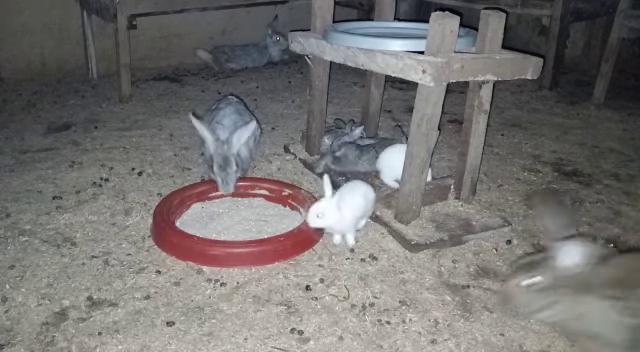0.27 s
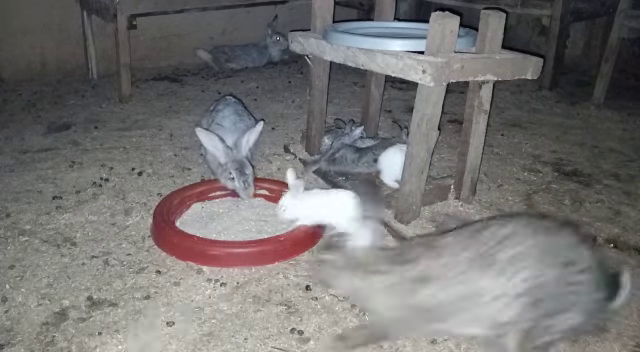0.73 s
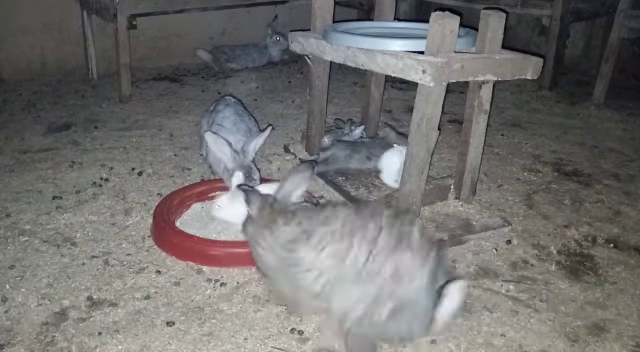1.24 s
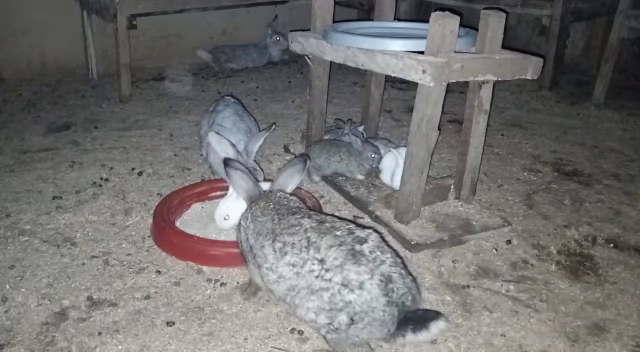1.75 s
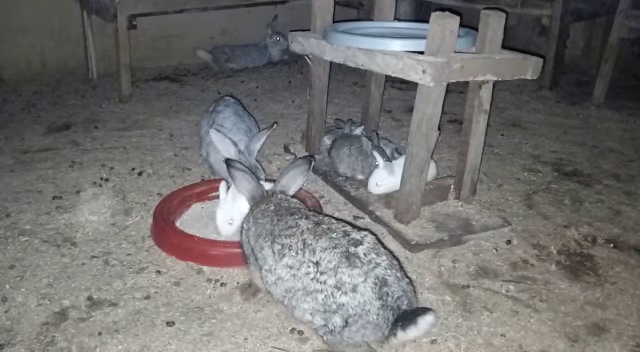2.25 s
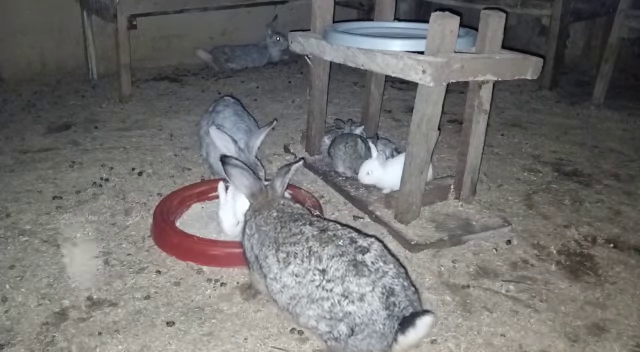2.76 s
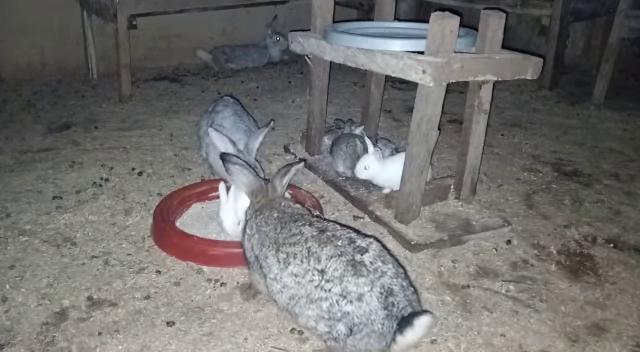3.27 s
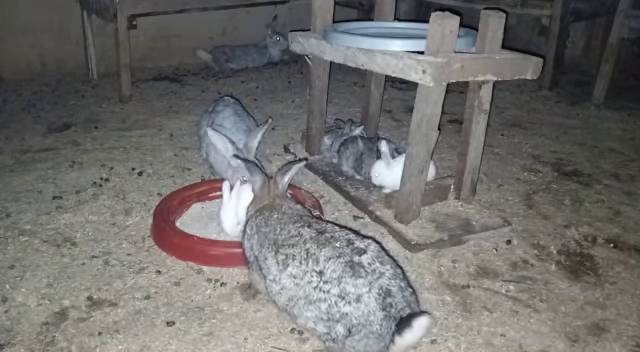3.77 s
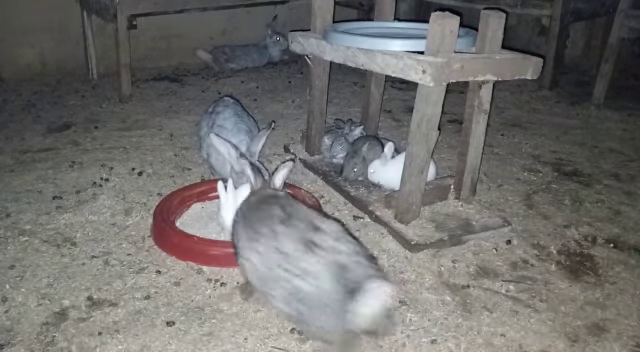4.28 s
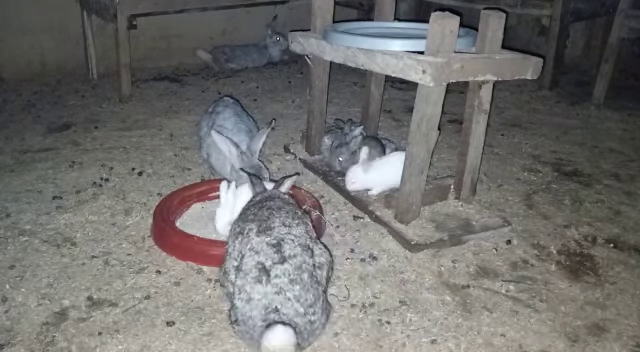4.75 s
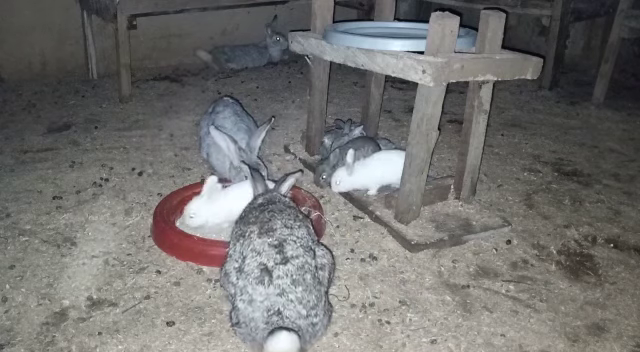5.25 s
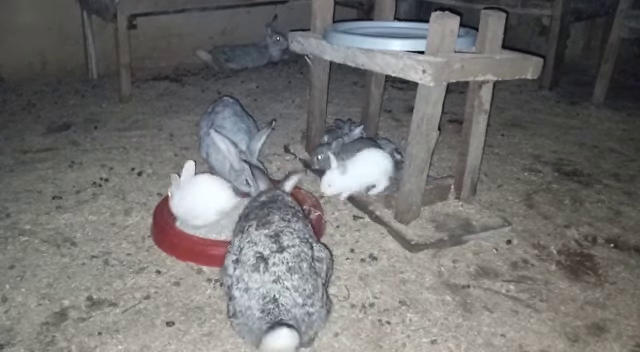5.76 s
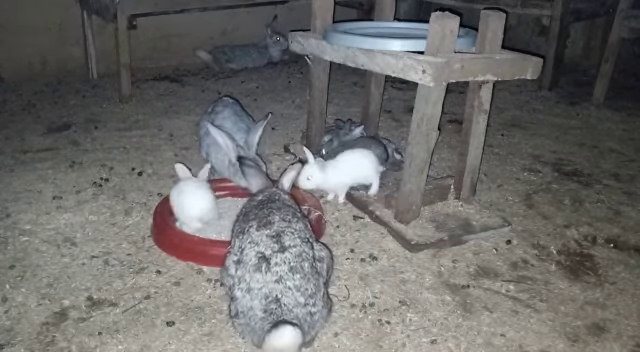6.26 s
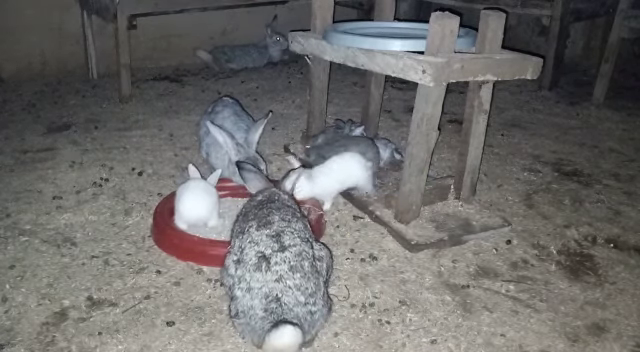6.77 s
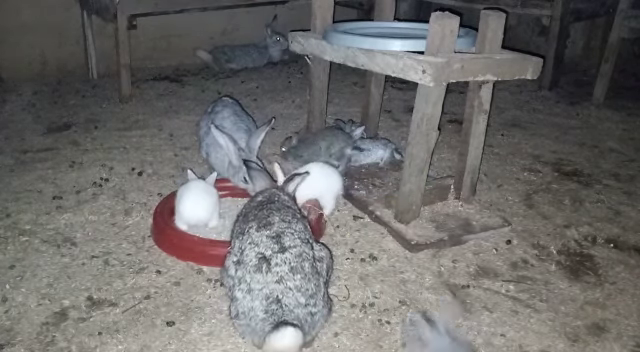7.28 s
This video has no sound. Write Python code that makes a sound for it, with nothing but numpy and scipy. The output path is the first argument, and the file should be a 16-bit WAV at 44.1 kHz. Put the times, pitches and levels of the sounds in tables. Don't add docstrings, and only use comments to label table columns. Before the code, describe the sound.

Piercing, rapid cricket chirping dominates a quiet night pen, with soft rabbit scuffs, tray knocks, dull foot thumps and one tiny low grunt.

```python
import sys
import numpy as np
from scipy import signal
from scipy.fft import rfft, irfft, next_fast_len
from scipy.io import wavfile
from scipy.ndimage import uniform_filter1d

SR = 44100
rng = np.random.default_rng(int(sys.argv[2]) if len(sys.argv) > 2 else 0)


def volts_from_db(level):
    exponent = np.asarray(level, float) / 20
    return 10 ** exponent


def bounce(signal):
    frames = np.transpose(np.atleast_2d(signal))
    limited = np.clip(frames, -1, 1)
    pcm = np.round(limited * 32767).astype(np.int16)
    wavfile.write(sys.argv[1], SR, pcm)


N = 331632


def evened(x):
    return x / np.sqrt(np.mean(x ** 2) + 1e-20)


def read(points, hz):
    f, value = np.transpose(points)
    return np.interp(np.log(hz + 1), np.log(f + 1), value)


def add(mix, s, sound):
    at = int(np.ceil(s * SR))
    part = mix[max(at, 0):][:max(len(sound) + min(at, 0), 0)]
    part += sound[max(-at, 0):][:len(part)]


def coloured(x, points):
    size = next_fast_len(len(x))
    gain = volts_from_db(read(points, np.fft.rfftfreq(size, 1 / SR)))
    return irfft(rfft(x, size) * gain, size)[:len(x)]


def resonate(x, hz, width_hz):
    r = np.exp(-np.pi * width_hz / SR)
    return 2 * signal.lfilter([1 - r], [1, -r * np.exp(2j * np.pi * hz / SR)], x).real


def resonate_twice(x, hz, width_hz):
    return resonate(resonate(x, hz, width_hz), hz, width_hz)


def ramp(left, width):
    return np.sin(np.pi / 2 * np.clip(left / width, 0, 1)) ** 2


def chirps():
    # (start [s], chirps [count], gap [ms])
    even_runs = [(0.0047, 6, 104.9), (0.6372, 2, 114.3), (0.8596, 4, 107.3), (1.2861, 4, 106.5),
                 (1.709, 5, 104.3), (2.2346, 3, 102.7), (2.5465, 2, 110.2), (2.7622, 2, 103.4),
                 (2.9706, 2, 109.4), (3.1898, 4, 106.4), (3.6186, 3, 103.9), (3.9328, 2, 103.8),
                 (4.144, 2, 109.3), (4.3596, 3, 104.7), (4.676, 3, 106.5), (5.0017, 2, 117.0),
                 (5.2306, 2, 140.4), (5.4849, 2, 112.7), (5.703, 3, 106.4), (6.0233, 5, 104.5),
                 (6.5484, 4, 104.7), (6.9782, 6, 105.1)]
    # (time [s], level [dB])
    effort_curve = [(0, -2), (.8, -0.98), (2.5, -0.96), (4.7, -0.6), (5.5, -1.12), (7.5, -1)]
    s = np.concatenate([start + gap_ms / 1000 * np.arange(round(count)) for start, count, gap_ms in even_runs])
    uneven, catch = rng.standard_normal((len(s), 2)).T
    level_db = np.interp(s, *np.transpose(effort_curve)) + 0.17 * uneven
    return np.transpose([s, level_db, 1.5 + 0.9 * catch])


def wing_strokes(before):
    # (start [s], pitch [factor], glide [share], tone [dB], overtone [dB], scrape [dB])
    stroke_table = [
        (-.0560, .825, 0.28, -32.5, -21, -17),
        (-.0472, 0.97, 0.8, -16.5, 3.5, -7),
        (-.03226, 0.99, 0.89, -4.5, 12, -2),
        (-.01441, 1, 1, -0.93, 2.5, -5.5),
    ]
    wing_glide = 7780.6, 6904.8, .672, .01283, .00139, .00535, .008
    top_hz, end_hz, bend, length, rise, fall, high_fall = wing_glide
    tone, overtone, scrape = np.zeros((3, before + N + 32))
    song = chirps()
    chance = rng.standard_normal((len(song), len(stroke_table), 4))
    chance[:, -1, 0] = 0
    for (s, level_db, catch_db), dice in zip(song, chance):
        for stroke, (early, sharp, strong, hard) in zip(stroke_table, dice):
            lead, pitch, share, tone_db, over_db, scrape_db = stroke
            start = before / SR + s + lead + 3e-5 * early
            u = (np.arange(int(length * SR)) + (-start * SR) % 1) / SR
            v = u / length
            glide = top_hz * v + share * (end_hz - top_hz) * v ** (bend + 1) / (bend + 1)
            detune = 1 + 0.0016 * np.clip(sharp, -1.5, 1.5) / share ** 1.8
            phase = 2 * np.pi * length * pitch * detune * glide
            size = volts_from_db(level_db + 0.36 * strong / share ** 1.5) * ramp(u, rise)
            size = size * ramp(2.5 * share * length - u, 0.004)
            add(tone, start, volts_from_db(tone_db) * size * ramp(length - u, fall) * np.cos(phase))
            add(overtone, start, volts_from_db(over_db) * size * ramp(length - u, high_fall) * np.cos(2 * phase))
            friction = np.exp(-u / 0.0013) + 0.14 * ramp(length - u, fall)
            add(scrape, start, volts_from_db(scrape_db + catch_db + 1.8 * hard) * friction)
    return tone, overtone, scrape * rng.standard_normal(len(scrape))


def slips(length, before):
    # (time [s], level [dB])
    slip_times = [(.393, 1), (.623, 0), (1.272, 0), (1.485, -3), (1.695, -2), (2.093, -2), (2.202, -5),
                  (2.514, -6), (2.625, 1), (3.047, -6.5), (3.918, -4), (4.857, -9), (5.072, -2.5),
                  (5.453, 2.5), (5.777, 1), (6.304, -3), (6.945, -2), (7.052, -2), (7.367, 1)]
    # (frequency [Hz], level [dB])
    slip_colour = [(6500, -38.5), (8200, -3.5), (9500, -3.5), (11000, -6.5), (12500, -18.5), (14000, -16.5),
                   (16500, -34.5)]
    out, u = np.zeros(length), np.arange(400) / SR
    noises = rng.standard_normal((len(slip_times), len(u)))
    for (s, level_db), noise in zip(slip_times, noises):
        click = evened(noise * np.exp(-u / 0.0015)) * 0.24
        add(out, before / SR + s, volts_from_db(level_db + 2.5) * click)
    return coloured(out, slip_colour)


def paths(table):
    ms, db = np.transpose(table)
    lag = np.arange(2600)[:, None] - 32 - ms * SR / 1000
    return (volts_from_db(db) * np.sinc(lag) * np.exp(-(lag / 12) ** 2)).sum(axis=1)


def late(start_s, seed_taps, haste):
    # (frequency [Hz], t60 [s])
    pen_decay = [(5000, 0.17), (7300, 0.6), (10000, 0.091), (15000, 0.15)]
    hz, t, z = signal.stft(seed_taps, SR, nperseg=128)
    decay = volts_from_db(-60 * haste * t / read(pen_decay, hz)[:, None])
    tail = signal.istft(z * decay, SR, nperseg=128)[1]
    tail = tail * np.clip(np.arange(len(tail)) / SR / start_s - .5, 0, 1)
    return tail / np.linalg.norm(tail)


def cricket():
    # (delay [ms], level [dB])
    tone_paths = [(-0.007, -38.9), (1.142, -30.2), (2.06, -31.4), (2.97, -28.1), (4.146, -33.6),
                  (5.194, -35.1), (6.626, -45.4), (7.766, -46.7), (9.032, -37.1), (10.861, -33.9),
                  (11.728, -40.0), (12.46, -35.5), (13.861, -36.0), (15.46, -38.4), (16.781, -50.2),
                  (18.341, -40.3), (22.872, -44.3), (24.276, -47.1), (26.733, -50.6), (32.363, -45.7),
                  (33.82, -46.5), (34.861, -43.6), (40.153, -50.2), (42.899, -51.3), (43.951, -44.8),
                  (46.311, -49.0), (48.351, -52.2), (52.178, -52.0)]
    # (delay [ms], level [dB])
    overtone_paths = [(0.462, -75.0), (1.374, -75.2), (2.03, -61.5), (2.479, -60.5), (3.2, -63.0),
                      (3.647, -63.9), (4.502, -71.8), (5.225, -69.9), (5.864, -75.3), (6.802, -71.4),
                      (7.741, -75.8), (11.794, -81.5), (18.81, -76.1), (19.262, -75.2)]
    # (frequency [Hz], level [dB])
    overtone_colour = [(11500, -45), (12800, -11), (13700, -11.5), (14400, -1), (15600, 2.5),
                       (16100, -18.5)]
    # (frequency [Hz], level [dB])
    scrape_colour = [(4800, -41.5), (5600, -30), (6500, 5.5), (8200, -1), (9500, -5.5), (11000, -18),
                     (12800, -31.5), (15000, -16), (16500, -42.5)]
    before = SR // 10
    tone, overtone, scrape = wing_strokes(before)
    low_wing_mode = volts_from_db(-21.5) * resonate_twice(scrape, 5290, 200)
    scrape = coloured(scrape, scrape_colour) + low_wing_mode + slips(len(scrape), before)
    overtone = coloured(overtone, overtone_colour)

    def hear(x, response):
        return signal.oaconvolve(x, response)[before + 32:][:N]

    near = volts_from_db(1.93) * hear(tone, paths(tone_paths)) + volts_from_db(4.0) * hear(overtone, paths(overtone_paths))
    far = hear(volts_from_db(-45.0) * tone + volts_from_db(-71) * overtone, late(0.018, rng.standard_normal(SR // 3), 0.76))
    catch = late(0.0014, rng.standard_normal(SR // 3), 1.5)
    catch[110] += .35
    return near + far + volts_from_db(-38.0) * hear(scrape, catch)


def night():
    # (frequency [Hz], density [dB per Hz])
    night_colour = [(12, -27.5), (20, 0), (43, -0.5), (91, 0), (210, -3), (656, -13), (754, -13),
                    (2050, -19.5), (2360, -19.5), (2710, -20), (3840, -22), (4850, -21), (5200, -19.5),
                    (6760, -42), (11400, -120)]
    frames, hz = N // 256 + 5, np.fft.rfftfreq(1024, 1 / SR)
    a, b, patches = rng.standard_normal((frames, 513, 3)).T
    patches = uniform_filter1d(patches, size=10, axis=0)
    patches = evened(uniform_filter1d(patches, size=12, axis=1))
    z = (a + 1j * b) * volts_from_db(read(night_colour, hz)[:, None] + 1.5 * patches)
    return volts_from_db(-81.5) * evened(signal.istft(z, nperseg=1024, noverlap=768)[1][:N])


def far_insect(level, hz, width_hz):
    return level * evened(resonate_twice(rng.standard_normal(N), hz, width_hz))


def wavering():
    width = int(.03 * SR)
    swell = uniform_filter1d(uniform_filter1d(rng.standard_normal(N), width), width)
    return volts_from_db(-94.5 + 3.5 * evened(swell))


def contacts(events):
    out, t, place = np.zeros(N), np.arange(SR // 3) / SR, np.linspace(0, 1, num=7)
    for s, peak_db, low_hz, high_hz, high_db, length in events:
        noise, size, pick = rng.standard_normal(len(t)), rng.exponential(1, len(t)), rng.random(len(t))
        clicks = (pick < 500 / SR) | (np.arange(len(t)) == 40)
        grit = 0.15 * noise + np.sign(noise) * volts_from_db(3.7 * np.minimum(size, 3)) * clicks
        swell = np.clip(t / min(0.0031, 0.25 * length), 0, 1)
        spread = max(1, 0.93 * np.log(high_hz / low_hz))
        sound = 0
        for where, stray in zip(place, rng.uniform(-1.3, 1, len(place))):
            hz = low_hz * (high_hz / low_hz) ** where * (1 + .04 * stray)
            width_hz = 60 + 0.076 * hz * spread
            t60 = 0.29 * (700 / hz) ** 0.65
            shape = swell * volts_from_db(-60 * np.maximum(t - length, 0) / t60 - 4 * t / length)
            mode = evened(resonate_twice(grit, hz, width_hz))
            sound = sound + volts_from_db(where * high_db) * mode * shape * volts_from_db(1.0 * stray)
        add(out, s, volts_from_db(peak_db - 11.0) * sound)
    return out


def scuffs():
    # (time [s], peak [dB], lowest mode [Hz], length [s])
    scuff_table = [(0.238, -72.5, 952, 0.034), (0.528, -75.5, 1540, .031), (0.703, -76, 898, 0.026),
                   (1.086, -64, 1610, .061), (1.39, -74, 684, .065), (1.629, -77.5, 2030, .03),
                   (2.613, -65, 1740, 0.019), (2.65, -78, 1370, 0.036), (3.114, -77.5, 697, .046),
                   (3.355, -72.5, 410, 0.064), (3.432, -75.5, 390, 0.052), (3.773, -72.5, 974, .034),
                   (3.869, -78.5, 845, 0.051), (5.73, -67, 1414, 0.042), (5.738, -79, 2960, .033),
                   (5.94, -70, 978, 0.025), (6.047, -72.5, 890, 0.044), (6.141, -78, 684, .035),
                   (6.642, -72.5, 853, 0.035), (6.81, -85, 1280, .13), (7.39, -56, 1454, 0.0627)]
    return contacts([(s, db, hz, hz * 1.385, -4.5, length) for s, db, hz, length in scuff_table])


def grunt():
    # (time [s], level [dB], pitch [Hz], second harmonic [dB])
    grunt_curve = [
        (0.72, -80, 247, -4),
        (0.744, -71, 250.4, -24.5),
        (0.776, -75.5, 218, -6.5),
        (0.838, -66.5, 224, -7),
        (0.868, -74.5, 208.4, -13),
        (0.91, -70.5, 210, -21),
    ]
    s, *columns = np.transpose(grunt_curve)
    t = np.arange(s[0], s[-1], 1 / SR)
    level_db, hz, second_db = (np.interp(t, s, c) for c in columns)
    jitter = evened(uniform_filter1d(rng.standard_normal(len(t)), size=300))
    phase = 2 * np.pi * np.cumsum(hz * (1 + 0.065 * jitter)) / SR
    voice = np.sin(phase) + volts_from_db(second_db) * np.sin(2 * phase)
    out = np.zeros(N)
    add(out, s[0], np.sqrt(2) * volts_from_db(level_db) * voice * signal.windows.tukey(len(t), .15))
    return out


def knocks():
    # (time [s], peak [dB], lowest mode [Hz], highest mode [dB], length [s])
    knock_table = [(0.89, -78.5, 1849, 0, 0.029), (1.203, -69, 660, -1, 0.017),
                   (1.22, -57, 2240, -9, 0.045), (1.217, -47, 716, -8.5, 0.059),
                   (1.263, -51.5, 690, -10, .061), (1.332, -63.5, 524, -3, .041),
                   (3.09, -76, 1005, 3, 0.033), (3.353, -76, 1160, -4, 0.043),
                   (4.138, -58.5, 1710, -3, 0.034), (4.18, -62.5, 1550, -1, 0.031),
                   (4.693, -59.5, 757, -6, 0.043), (4.703, -71, 1490, 0, 0.022),
                   (5.677, -73.5, 514, -3, 0.068), (6.579, -58.5, 615, 8, 0.04),
                   (6.579, -66.5, 1880, -8, 0.037), (7.197, -60, 378, -12, 0.026),
                   (7.253, -70.5, 500, 1.5, 0.032), (7.339, -56, 478.1, -4, 0.032),
                   (7.389, -61.5, 2220, -8, 0.038), (7.394, -62, 422, 3, .06)]
    return contacts([(s, db, hz, hz * 2.404, tilt_db, length) for s, db, hz, tilt_db, length in knock_table])


def thumps():
    # (time [s], peak [dB], frequency [Hz], t60 [s])
    thump_table = [(0.911, -66, 63.5, 0.18), (1.063, -76, 45.85, 0.25), (1.426, -72, 79.5, 0.114),
                   (1.574, -75.5, 59.2, 0.12), (2.779, -83.5, 80.7, 0.13), (3.086, -62, 59.2, 0.1),
                   (3.221, -69.5, 56.5, 0.16), (3.627, -73, 67, 0.15), (3.758, -73, 66.5, 0.16),
                   (3.98, -81, 72.7, 0.15), (4.163, -65, 58.6, 0.16), (4.294, -75, 67.27, 0.16),
                   (4.708, -69, 59, 0.2), (4.899, -64, 67.3, 0.17), (5.004, -68, 64, 0.1),
                   (5.239, -71, 61.9, 0.18), (5.416, -65, 60.05, 0.16), (5.769, -66, 54.6, 0.2),
                   (6.336, -68, 64.6, 0.12), (6.475, -72, 53.8, 0.23), (6.882, -65, 62.17, 0.11),
                   (7.408, -68, 83.4, 0.1), (7.12, -75, 150, .08), (4.889, -71.5, 169, 0.11),
                   (5.95, -74, 58.6, .15), (5.67, -79, 70, 0.14), (2.209, -79, 150, .08),
                   (2.52, -79, 60.4, .15)]
    out, t = np.zeros(N), np.arange(SR // 3) / SR
    for s, peak_db, hz, t60 in thump_table:
        decay = volts_from_db(peak_db - 60 * t / max(t60, .03))
        soft_onset = 1 - np.exp(-t / 0.011)
        add(out, s, decay * soft_onset * 2.71 * np.sin(2 * np.pi * hz * t))
    return out


def bouts():
    # (start [s], length [s], level [dB])
    bout_table = [
        (2.146, 0.34, -83),
        (2.746, .3, -87),
        (3.897, .3, -83),
        (4.148, 0.77, -75),
        (5.621, 0.32, -77),
        (6.6, .3, -83),
    ]
    level = np.zeros(N)
    for s, length, level_db in bout_table:
        add(level, s, volts_from_db(level_db) * signal.windows.tukey(int(length * SR), .5))
    return level


def snaps():
    # (time [s], peak [dB], highest mode [Hz], length [s])
    snap_table = [
        (2.613, -65, 8900, 0.021),
        (4.683, -70.5, 5000, .011),
    ]
    return contacts([(s, db, 500, hz, -2, length) for s, db, hz, length in snap_table])


def scene():
    insects = cricket() + far_insect(wavering(), 2370, 210) + far_insect(bouts(), 6180, 220)
    rabbits = scuffs() + grunt() + knocks() + thumps() + snaps()
    return (insects + night() + rabbits)[None]


def band_limit(x):
    return signal.sosfilt(signal.butter(12, 16970, fs=SR, output="sos"), x)


def record(dry):
    highpass = signal.butter(N=2, Wn=45, btype="high", fs=SR, output="sos")
    heard = signal.sosfilt(highpass, dry)
    return band_limit(heard)


dry = scene()
out = record(dry)
bounce(out)
```